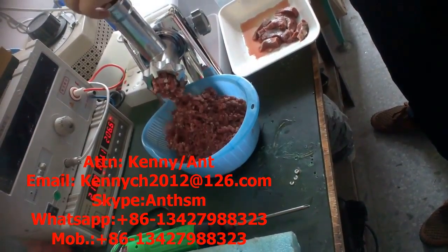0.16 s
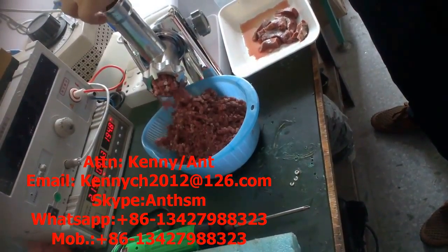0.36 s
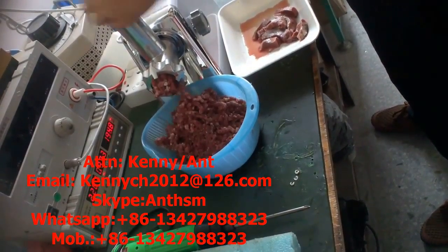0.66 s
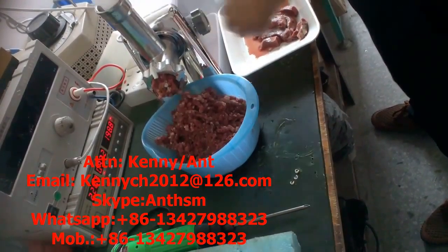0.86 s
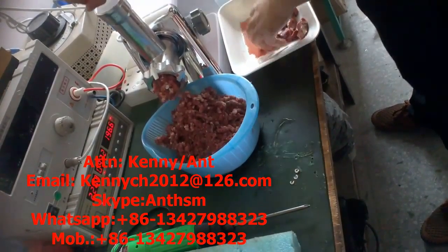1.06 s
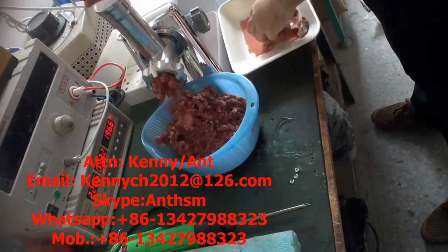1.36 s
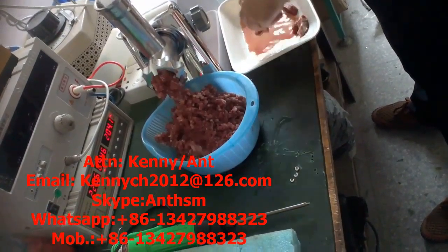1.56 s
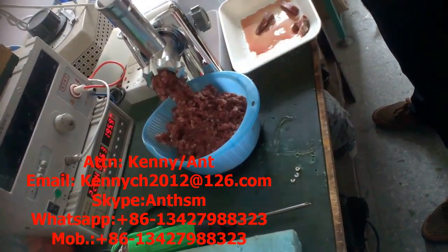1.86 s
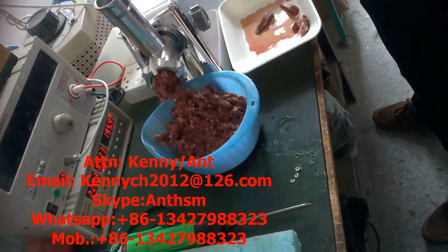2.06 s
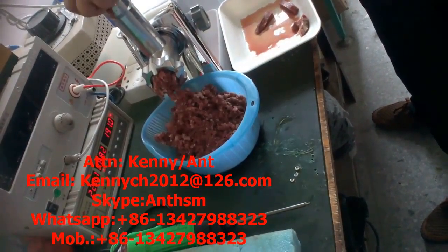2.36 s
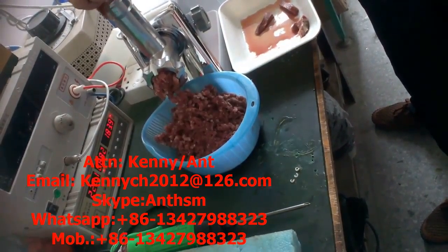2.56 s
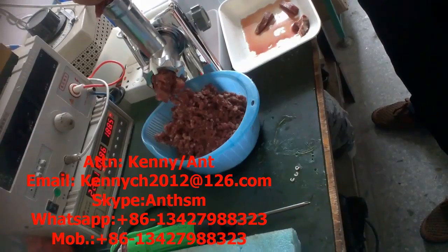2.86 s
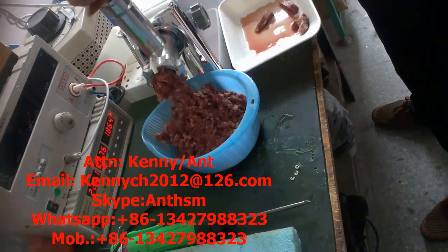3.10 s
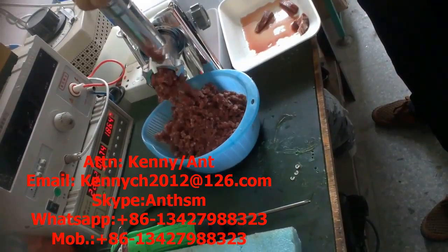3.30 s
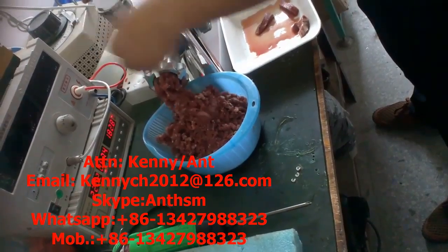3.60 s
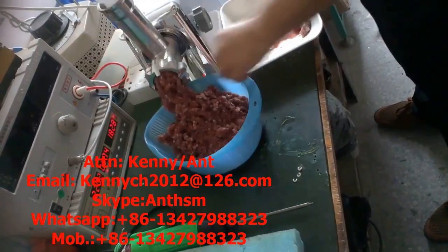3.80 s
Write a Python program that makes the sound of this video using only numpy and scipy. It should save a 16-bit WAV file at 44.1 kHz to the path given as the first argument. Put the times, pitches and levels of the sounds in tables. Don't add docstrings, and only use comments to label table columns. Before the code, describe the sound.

An electric meat grinder runs throughout, close and mono, already at speed. A wavering gear whine near 1.4 kHz sits over a lower drone, mains hum, rattle and brush hiss. Crackles of mince cluster in the first 0.7 seconds, then scatter. The whine swells around 1.4, pitch dips near 1.5, recovers and settles slightly higher after 2.3. Faint dull knocks fall near 0.2, 1.8 and 3.5; it ends still running at about 4 seconds.

```python
import sys
import numpy as np
from scipy import signal
from scipy.fft import rfft, irfft
from scipy.io import wavfile
from scipy.ndimage import uniform_filter1d

SR = 44100
rng = np.random.default_rng(int(sys.argv[2]) if len(sys.argv) > 2 else 0)


def store_wav(level_fs):
    pcm = np.round(np.clip(np.atleast_2d(level_fs), -1, 1) * 32767)
    wavfile.write(sys.argv[1], SR, pcm.T.astype(np.int16))


def attenuation_scalar(level_db):
    decades = np.asarray(level_db, float) / 20
    return 10 ** decades


N = 173754


def table(rows):
    return np.array(rows, float).T


def level(x, db):
    return x * attenuation_scalar(db) / np.sqrt(np.mean(x ** 2))


def walk(rate):
    hold = int(SR / rate)
    steps = np.repeat(rng.standard_normal(N // hold + 1), hold)
    return 1.3 * uniform_filter1d(uniform_filter1d(steps, hold), hold)[:N]


def band(x, hz, width):
    return signal.lfilter(*signal.iirpeak(hz, hz / width, SR), x)


def noise_band(size, hz, width):
    return band(band(rng.standard_normal(size), hz, width), hz, width)


def coloured_noise(points):
    hz, db = table(points)
    f = np.maximum(np.fft.rfftfreq(N, 1 / SR), 1)
    gain = attenuation_scalar(np.interp(np.log(f), np.log(hz), db, left=-90, right=-90))
    return irfft(rfft(rng.standard_normal(N)) * gain, N)


def tone(turns, db, fade_db=2.0, rough=0.44, rate=40):
    wobble = 1 + rough * (walk(rate) + 1j * walk(rate))
    spin = np.exp(2j * np.pi * (turns + rng.random()))
    return np.sqrt(2) * attenuation_scalar(db + fade_db * walk(6.853)) * (wobble * spin).real


def decay(age, t60):
    return np.exp(-np.log(1000) * age / t60)


def ring(hz, t60, size):
    age = np.arange(size) / SR
    return np.sin(2 * np.pi * hz * age) * decay(age, t60)


def swell(t, rows):
    return sum(db * np.exp(-.5 * ((t - s) / length) ** 2) for s, db, length in rows)


# time in seconds, speed in turns per second.
MOTOR_SPEED = [(0, 202), (.07, 202.4), (.22, 207), (.48, 201.6), (.92, 203.7), (1.22, 203.7), (1.52, 192.7),
               (1.77, 204.4), (2.0, 201.5), (2.3, 212.3), (2.4, 210.7), (2.55, 205.7), (2.78, 210.5),
               (3.1, 209.6), (3.32, 213.8), (3.51, 213), (3.68, 214.6), (3.94, 212.4)]


def shaft(t):
    speed = uniform_filter1d(np.interp(t, *table(MOTOR_SPEED)), size=2500)
    turns = np.cumsum(speed * (1 + .0003 * walk(12))) / SR
    return turns, speed


# time in seconds, level in dB.
WHINE = [(0, -41), (.24, -41.5), (.48, -41.5), (.75, -38), (1.0, -41.5), (1.27, -37), (1.43, -33.5),
         (1.55, -43), (1.75, -43), (1.98, -38), (2.2, -45.5), (2.5, -49.5), (2.8, -45), (3.13, -50),
         (3.5, -50.5), (3.72, -40), (3.85, -47.5), (3.94, -31)]
# centre in seconds, change in dB, length in seconds.
BINDS = [(0.223, 5.5, 0.033), (0.295, -4, 0.018), (0.416, 3.5, 0.028), (0.927, -13, 0.022),
         (1.17, 6.5, 0.022), (1.29, 6.5, 0.03), (1.37, 0.5, 0.01), (1.416, 8, 0.013), (1.436, -10, .006),
         (1.447, 8.5, 0.0073), (1.516, -6, .015), (1.546, 7.5, 0.011), (1.575, -16, 0.013),
         (1.729, 7, 0.016), (1.779, -9, 0.018), (1.945, 1.5, 0.018), (2.033, -9, 0.015),
         (2.054, 3.5, 0.0072), (2.111, -11, 0.015), (2.144, 6, 0.015), (2.44, 15, 0.015),
         (2.457, -13, 0.0091), (2.549, 12, .015), (2.703, 8, 0.028), (3.09, 8.5, 0.017), (3.23, 7, 0.027),
         (3.315, -9, .015), (3.484, 12, 0.026), (3.53, 5, .01), (3.793, 6, 0.028), (3.856, -9.5, 0.017)]
# level in dB at -2, -1, +1 and +2 wheel turns.
RUNOUT_DB = [-56, -54, -54, -59]
DRONE_DB = [-68.5, -60, -55, -54, -50.5, -47.5, -50, -76]


def gears(t, turns, speed):
    pinion_teeth, wheel_teeth = 7, 54
    mesh = turns * pinion_teeth
    wheel = mesh / wheel_teeth
    whine_db = np.interp(t, *table(WHINE)) + swell(t, BINDS)
    whine = tone(mesh, whine_db, fade_db=.5, rough=.25, rate=30)
    out = whine * (1 + .28 * np.cos(2 * np.pi * (wheel + .06)))
    for k, db in zip((-2, -1, 1, 2), RUNOUT_DB):
        out = out + tone(mesh + k * wheel, db + .25 * (whine_db + 42), rough=.25)
    beat = 1 + .1 * np.cos(2 * np.pi * wheel)
    for k, db in enumerate(DRONE_DB):
        tilt = .7 * np.clip(k - 5, -1, 1) * (k > 2)
        out = out + beat * tone(wheel * (k + 13), db - tilt * (speed - 206), fade_db=1.5, rough=.22, rate=18)
    return out


# multiple of motor speed, level in dB.
ROTOR = [(3, -64), (4, -64), (5, -68), (6, -57), (8, -54), (9, -65), (10, -65), (11, -63), (13, -66),
         (14, -58), (15, -71), (17, -73), (21, -73)]
# multiple of motor speed, level in dB.
BARS = [(35, -63), (42, -61), (44, -67)]
# multiple of motor speed, level in dB, dB gained per turn/s above 205,
# lower and upper mains sideband in dB relative to the tone.
SLOTS = [(36, -57, .45, -4, -2), (48, -59, -.3, -7.5, -9)]
# time in seconds, tone in dB, upper mains sideband in dB.
SLOT_TONE = [(0, -61, -60), (.25, -48.5, -56), (.45, -54, -60), (.72, -54, -64), (.87, -53, -43.5),
             (1.05, -55, -57.5), (1.22, -50, -56), (1.5, -65, -60), (1.85, -50, -49.5), (1.97, -53, -62),
             (2.1, -58, -43.5), (2.33, -50.5, -76), (2.5, -56, -60), (2.67, -53, -49), (2.9, -59, -73),
             (3.18, -57, -64), (3.26, -46, -57), (3.7, -53, -69)]
# frequency in Hz, level in dB.
HUM = [(300, -67), (400, -44.5)]
# centre in seconds, change in dB, length in seconds.
DRAWS = [
    (0.41, 3.5, 0.035),
    (.6, -2.5, 0.075),
    (0.784, 9, 0.022),
    (1.074, 7, 0.044),
    (1.56, 10.5, 0.048),
    (1.843, 5, 0.046),
    (2.35, -0.5, 0.049),
    (2.57, 6, 0.021),
    (3.37, 5, 0.014),
]


def motor(t, turns, speed):
    out = np.zeros(N)
    twice_mains = 100 * t
    for k, db in ROTOR:
        sag_db = 0.19 * (k > 9) * np.minimum(speed - 203, 0)
        out = out + tone(turns * k, db - .3 + sag_db, fade_db=2.4, rough=0.52)
    for k, db in BARS:
        out = out + tone(turns * k, db, fade_db=2.4, rough=.45, rate=30)
    for k, db, slope, below, above in SLOTS:
        lean = 1.6 if k > 40 else 1.1
        for side, rel in ((-1, below), (0, 0), (1, above)):
            side_db = db + rel + slope * (1 - lean * side) * (speed - 205)
            out = out + tone(turns * k + side * twice_mains, side_db, fade_db=2.2, rough=.15)
    at, *slot_db = table(SLOT_TONE)
    for side, db in enumerate(slot_db):
        out = out + tone(turns * 12 + side * twice_mains, np.interp(t, at, db), fade_db=1.0, rough=.2)
    out = out + tone(turns * 12 - twice_mains, -63, fade_db=3.0, rough=.3)
    draw_db = swell(t, DRAWS)
    for hz, db in HUM:
        out = out + tone(t * hz, db - 0.96 + draw_db, fade_db=.8, rough=.22, rate=20)
    return out


# start in seconds, peak in dB, centre in Hz, share of sharp snap from 0 to 1.
CRACKLES = [(0.0925, -23, 7100, 0.14), (0.143, -28, 6900, .05), (0.181, -36, 8700, .05),
            (0.21, -27.5, 7500, .05), (0.261, -25, 7200, .05), (0.514, -26, 8400, 0),
            (0.852, -34, 7200, .1), (1.069, -28.5, 8750, 0.14), (1.227, -34, 7460, 0.3),
            (1.334, -30, 8650, 0), (1.412, -27, 8000, 0.2), (1.586, -27, 7500, 0.2), (1.927, -28, 7400, .1),
            (2.132, -26.5, 7460, 0), (2.339, -27.5, 7000, .1), (2.426, -26.5, 9200, 0),
            (3.183, -28, 7500, 0.3), (3.522, -26, 7500, 0), (3.68, -30, 7500, .1), (3.74, -28, 7500, 0),
            (3.9, -26, 7500, .1), (0.2972, -30, 8610, 0.15), (0.3313, -18.5, 8600, 0.55),
            (0.381, -26, 7100, 0.2), (0.43, -29, 8400, 0), (0.474, -23, 7300, 0.4),
            (0.558, -25.5, 7250, 0.47), (0.597, -21.5, 7700, 0), (0.6834, -22, 7770, 0.3),
            (0.9298, -36, 7000, 0.1), (1.0984, -38, 7900, 0.2), (1.5416, -26.5, 9000, 0.45),
            (1.718, -35, 7210, 0.15), (1.8383, -18, 7800, 0.2), (1.873, -25, 7360, 0),
            (2.0452, -24, 8200, 0), (2.464, -22.5, 7200, 0.3), (2.5087, -27.5, 7010, 0.15),
            (2.5447, -23, 8300, 0.06), (2.7891, -23, 7900, 0.15), (2.9618, -22, 7200, 0.2),
            (3.042, -22, 7570, 0.04)]


def mince():
    size = 2048
    out, age = np.zeros(N + 2 * size), np.arange(size) / SR
    fade = decay(age, t60=.03) * np.minimum(age / 0.002, 1)
    for s, db, hz, share in CRACKLES:
        snap = ring(hz, t60=.003, size=size) * np.minimum(age / .0002, 1)
        snap = snap + attenuation_scalar(-4) * np.roll(snap, int(.001 * SR))
        snap = np.roll(snap, int(.0013 * SR))
        burst = attenuation_scalar(-6) * fade * level(noise_band(size, hz, 2500), 0)
        start = int(s * SR)
        out[start:start + size] += attenuation_scalar(db) * (3.5 * share * snap + (1 - share) * burst)
    fizz_per_s, fizz_db, fizz_spread_db = 120, -47, 3.5
    chance, size_draw = rng.random((2, N))
    ticks = (chance < fizz_per_s / SR) * attenuation_scalar(fizz_db - fizz_spread_db * np.log(size_draw + 1e-9))
    tick_ring = ring(7300, 0.0024, size=512) + 0.21 * ring(7900, 0.0048, size=512)
    out = out[:N] + signal.fftconvolve(ticks, tick_ring)[:N]
    return signal.sosfilt(signal.butter(4, 5500, "high", fs=SR, output="sos"), out)


# start in seconds, peak in dB, centre in Hz, width in Hz, t60 in seconds.
KNOCKS = [(.23, -58, 280, 40, .1), (.245, -64, 35, 30, .06), (.328, -57, 70, 90, .05),
          (.14, -40, 2440, 60, .09), (1.83, -42, 355, 30, .2), (1.84, -42, 920, 510, .15),
          (1.84, -42, 2100, 500, .16), (2.75, -45, 1120, 80, .1), (2.4, -48, 1130, 90, .12),
          (3.084, -49, 313, 60, .06), (3.082, -63, 91, 160, .086), (3.249, -40, 2550, 40, .15),
          (3.25, -44, 2600, 380, .08), (3.528, -38.5, 1070, 40, .08), (.24, -44, 500, 50, .12),
          (3.36, -42, 430, 60, .08)]


def knocks():
    size = 8192
    out, age = np.zeros(N + size), np.arange(size) / SR
    for s, db, hz, width, t60 in KNOCKS:
        body = level(noise_band(2 * size, hz, width)[size:], db + 3.5)
        start = int(s * SR)
        out[start:start + size] += body * decay(age, t60) * np.minimum(age / 0.0049, 1)
    return out[:N]


# frequency in Hz, level in dB.
RATTLE = [(71, -89), (120, -92), (331, -23.5), (405, -1), (497, -10), (571, -12), (1330, -13.5),
          (1460, -4.5), (5000, -28), (6500, -72), (11000, -120)]
# frequency in Hz, level in dB.
HISS = [(2760, -51), (4700, -17.5), (5200, -14.5), (5670, -9), (6140, -3), (6900, 1), (8840, -0.5),
        (10500, -11), (11500, -24), (15000, -72), (22000, -120)]
# centre in Hz, width in Hz, level in dB.
HOUSING = [(291, 44, -67.5), (427.7, 68, -47), (1190, 265, -55.5), (2540, 300, -59), (2883, 74, -61.5),
           (4270, 290, -64), (5740, 210, -58.5), (7000, 170, -52.5), (8810, 98, -57.5)]


def rush(t, turns, speed):
    knife_db = (2 - .5 * t) * np.cos(2 * np.pi * (.116 * turns - .17))
    throb_db = knife_db - 0.2 * np.cos(2 * np.pi * 100 * t)
    shared_db = .9 * walk(28) + .4 * walk(12)
    sag_db = .06 * np.minimum(speed - 203, 0)
    out = level(coloured_noise(RATTLE), -45.5) * attenuation_scalar(shared_db + 1.6 * walk(8) + sag_db)
    out = out + level(coloured_noise(HISS), -45) * attenuation_scalar(shared_db + throb_db + .8 * walk(40))
    for hz, width, db in HOUSING:
        out = out + level(noise_band(N, hz, width), db) * attenuation_scalar(shared_db + 1.8 * walk(9))
    return out


def room_rumble():
    low = level(coloured_noise([(15, 4), (60, 10.5), (160, 15), (260, -6)]), -87.5)
    return low * attenuation_scalar(3.4 * walk(14)) * attenuation_scalar(2 * walk(6.2))


def scene():
    t = np.arange(N) / SR
    turns, speed = shaft(t)
    machine = gears(t, turns, speed) + motor(t, turns, speed)
    mono = machine + mince() + knocks() + rush(t, turns, speed) + room_rumble()
    return np.array([mono, mono])


def drop_faint(x):
    f, _, z = signal.stft(x, SR, nperseg=1280)
    power = np.abs(z[:640].reshape(160, 4, -1)) ** 2
    power = uniform_filter1d(power, size=3, axis=2).mean(1)
    hz = f[:640:4, None]
    top = hz > 10000
    usual = np.median(power[np.abs(hz[:, 0] - 4900) < 200])
    limit = usual * attenuation_scalar(np.where(top, -2, -.4)) ** 2
    faint = (power < limit) & (hz > 3000)
    gain = np.where(faint, np.where(top, .003, .04), 1)
    z[:640] *= np.repeat(gain, 4, axis=0)
    return signal.istft(z, SR, nperseg=1280)[1][:N]


def band_limit(x):
    return signal.sosfilt(signal.butter(12, 11690, fs=SR, output="sos"), x)


def record(dry):
    top_cut = signal.cheby2(10, 45, 10715 * 1.14, fs=SR, output="sos")
    x = drop_faint(signal.sosfilt(top_cut, dry[0]))
    return band_limit(np.array([x, x]))


dry = scene()
out = record(dry)
store_wav(out)
```